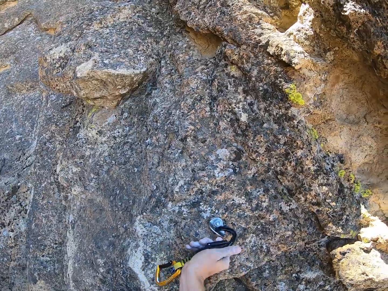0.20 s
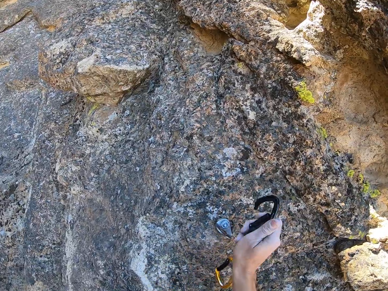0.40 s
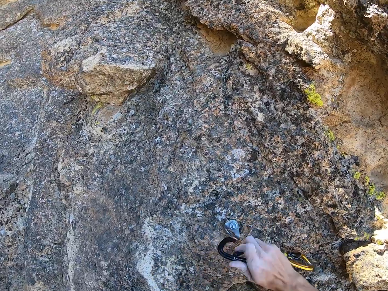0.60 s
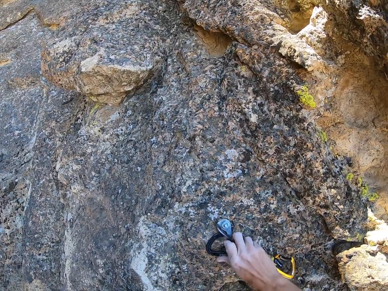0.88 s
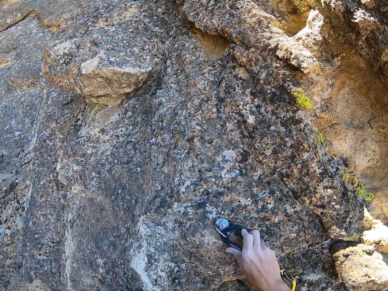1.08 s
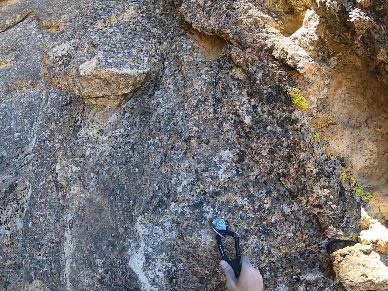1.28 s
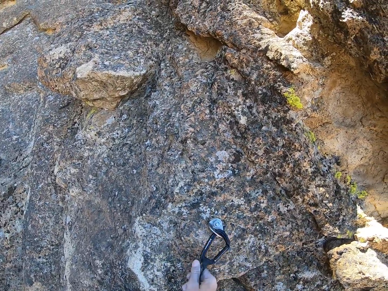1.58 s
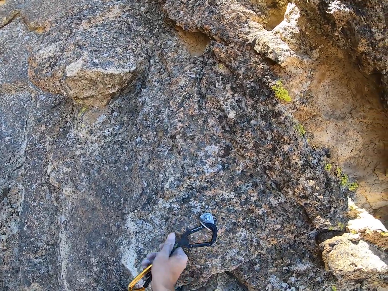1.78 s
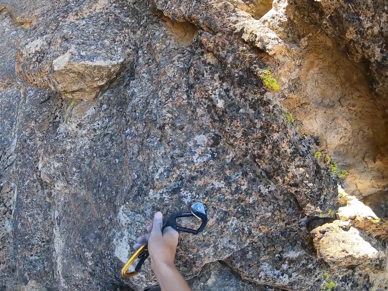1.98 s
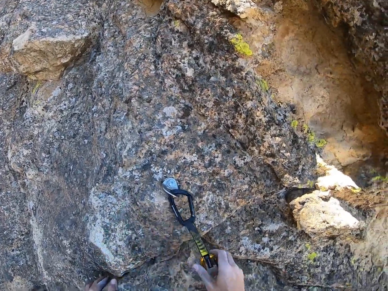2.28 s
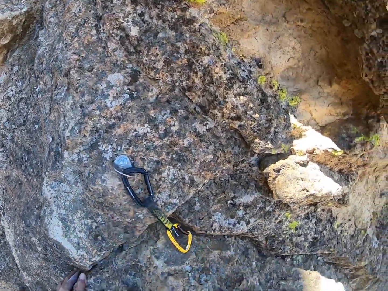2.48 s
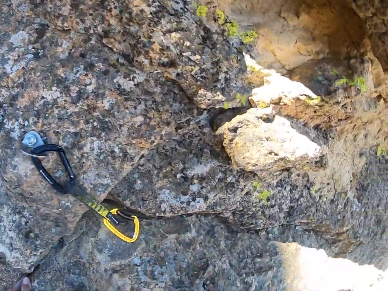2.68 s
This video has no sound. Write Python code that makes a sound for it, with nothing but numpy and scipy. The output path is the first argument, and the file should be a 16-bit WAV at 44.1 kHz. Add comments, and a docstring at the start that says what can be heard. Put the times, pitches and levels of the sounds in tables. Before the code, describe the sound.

Metal carabiners clack and rattle against a steel bolt and stone, close up, outdoors in light wind

```python
"""Clipping a quickdraw on a rock face

A climber clips a quickdraw into a bolt hanger, close to a small camera with two microphone ports.
Hand-damped carabiners clack on steel and stone (short damped modes with a crack of noise), a free one
rings faintly and hollow knocks sound (dying sines), and metal and webbing scrape (noise grains).
Sparse echoes return from rock and body; lumpy low noise is light wind, over a quiet outdoor floor."""
import sys
import numpy as np
from scipy import signal
from scipy.fft import rfft, irfft
from scipy.io import wavfile
from scipy.ndimage import uniform_filter1d

SR = 44100
rng = np.random.default_rng(int(sys.argv[2]) if len(sys.argv) > 2 else 0)


def volts_from_db(level):
    """Convert decibel levels to linear amplitude ratios."""
    exponent = np.asarray(level, float) / 20
    return 10 ** exponent


def master(y):
    """Save y as 16-bit WAV."""
    cut = np.clip(np.atleast_2d(y).T, -1, 1)
    pcm = np.round(cut * 32767)  # scale
    wavfile.write(sys.argv[1], SR, pcm.astype(np.int16))


N = 123480


def evened(x):
    """Scales a sound to an rms of one."""
    return x / np.sqrt(np.mean(x ** 2) + 1e-20)


def read(points, hz):
    """Reads a table of (frequency, value) along a logarithmic frequency axis."""
    f, value = np.transpose(points)
    return np.interp(np.log(hz + 1), np.log(f + 1), value)


def curve(rows, column):
    """Draws one table column as straight lines over the whole scene; times stand in column 0."""
    rows = np.array(rows)
    return np.interp(np.arange(N) / SR, rows[:, 0], rows[:, column])


def add(mix, s, sound):
    """Adds a sound into the mix at s seconds, cut at the end of the mix."""
    part = mix[max(round(s * SR), 0):][:len(sound)]
    part += sound[:len(part)]


def struck(modes, length):
    """A struck body: a sum of sines, each dying at its own t60."""
    t = np.arange(0, length, 1 / SR)
    return sum(volts_from_db(db - 60 * t / t60) * np.sin(2 * np.pi * hz * t) for hz, db, t60 in modes)


def clack(peak_db, centre_hz, high_db):
    """A quick contact rings hand-damped modes, the struck spot longest, with a crack of noise."""
    # modes of the held metal: (frequency [Hz], level [dB])
    held = [(1240, -2.5), (1520, -4), (2250, -4), (2700, -2), (3380, -3), (3900, -3.5), (4700, 0.5),
            (5350, 2.5), (6400, 5.5), (7500, 5.5), (8200, 5.5), (9200, 0.5), (10900, 1.5), (12600, -7.5)]
    hz, db = np.transpose(held)[:, :, None]
    t = np.arange(2000) / SR
    t60_s = 0.021  # at 5 kHz for the modes; higher ones die faster
    high_edge_hz = 5900  # where the highs reach high_db

    # tilt the modes away from the strongest region
    climb = np.minimum(np.log(hz / centre_hz) / np.log(high_edge_hz / centre_hz), 1)
    below = 8.0 * np.log2(hz / centre_hz)  # 8 dB per octave
    db = db + np.where(hz > centre_hz, high_db * climb ** 2, below)

    # every contact has slightly different mode levels, pitches and phases
    spread, detune, phase = rng.standard_normal((3, len(held), 1))
    mode_amp = volts_from_db(db + 2.0 * spread - 60 * t / t60_s * (hz / 5000) ** 0.3)
    ring = (mode_amp * np.sin(2 * np.pi * hz * (1 + 0.015 * detune) * t + phase)).sum(0)
    struck_spot = volts_from_db(2.5 - 60 * t / 0.04) * np.sin(2 * np.pi * centre_hz * t)
    ring = ring + struck_spot

    # the crack is noise with the spectrum of the modes
    colour = volts_from_db(read(np.c_[hz, db], np.fft.rfftfreq(len(t), 1 / SR)))
    crack = evened(irfft(rfft(rng.standard_normal(len(t))) * colour)) * volts_from_db(-60 * t / t60_s)
    sound = ring / abs(ring).max() + volts_from_db(-5.5) * crack
    rise = np.minimum(t / 0.0002, 1)
    band = signal.butter(3, [650, 12500], "band", fs=SR, output="sos")
    return volts_from_db(peak_db) * signal.sosfilt(band, sound * rise)


def clacks():
    """Held carabiners clacking on steel and stone, one damped contact after another."""
    # contacts: (time [s], level [dB], strongest region [Hz], highs [dB re that region])
    contacts = [(0.0024, -31.5, 4110, -23), (0.0748, -40, 4120, -22.5), (0.1316, -36, 3810, -19.5),
                (0.1533, -37, 3840, -12.5), (0.237, -18.5, 2250, -8.5), (0.244, -29.5, 1295, -37),
                (0.2962, -28, 3620, -12), (0.3384, -31.5, 1910, -17), (0.3486, -23.5, 2340, -8.5),
                (0.3617, -25, 2310, -13), (0.4341, -28.5, 3130, -14), (0.4394, -28.5, 2350, -9),
                (0.4516, -22.5, 2546, -11), (0.4818, -28.5, 2470, -9), (0.523, -36, 1240, -7.5),
                (0.5435, -23, 2785, -12), (0.595, -30, 2180, -18), (0.7052, -33, 1400, -15),
                (0.7501, -28.5, 1437, -17), (0.8145, -21, 3280, -11), (0.8769, -21, 2537, -28),
                (0.8825, -23, 4930, -51), (0.9149, -23, 4280, -14), (1.023, -24.5, 3650, -25),
                (1.0369, -30, 3300, -21.5), (1.051, -35, 3420, -10), (1.067, -17, 4620, -11),
                (1.0939, -14, 4080, -17), (1.1053, -22.5, 3340, -12), (1.1688, -46.5, 1640, -21.5),
                (1.2121, -18, 2750, -3), (1.338, -48, 3520, -17), (1.4616, -32.5, 4040, -22),
                (1.547, -29, 3270, -14), (1.634, -36, 3800, -10), (1.838, -45.5, 1390, -38),
                (1.9026, -48, 1290, -52), (1.95, -32, 4060, -19), (2.22, -50, 1240, -23),
                (2.238, -46.5, 3020, -17), (2.3206, -39, 2900, -29), (2.3313, -37.5, 3030, -24.5),
                (2.4573, -19.5, 3676, -15.5), (2.483, -42, 4500, 0), (2.5321, -10, 5295, -10),
                (2.5462, -21.5, 2920, -12), (2.569, -37.5, 2600, -35), (2.693, -33.5, 5440, -9),
                (2.7093, -34.5, 3350, -13), (2.732, -43, 5470, -5), (2.7513, -44.5, 3830, -23.5),
                (2.762, -37, 2500, -8)]
    out = np.zeros(N)
    for s, peak_db, centre_hz, high_db in contacts:
        add(out, s, clack(peak_db, centre_hz, high_db))
    return out


def free_rings():
    """A freely hanging carabiner rings its long modes until it is touched."""
    # modes of the free carabiner: (frequency [Hz], level [dB], t60 [s])
    free = [(3250, 0, .9), (3428, -13, .5), (3662, -10, .4), (7294, -18, .45), (9480, -18, .35)]
    # strikes: (time [s], level [dB], time until touched [s])
    strikes = [(.004, -66, 0.11), (0.241, -57, 0.19), (0.419, -50, 0.11), (0.542, -53.5, 0.04),
               (0.594, -60, 0.18), (0.704, -54, 0.064), (.755, -50, 0.044), (2.55, -60.5, 0.27)]
    out = np.zeros(N)
    for s, db, length in strikes:
        ring = struck(free, length + 0.012)
        touch = np.minimum(np.arange(len(ring))[::-1] / 440, 1)  # fades over the last 10 ms
        add(out, s, volts_from_db(db) * ring * touch)
    return out


def knocks():
    """Hollow knocks: two low modes, lowered in pitch for some of the blows."""
    # blows: (time [s], level [dB], pitch [share of the mode frequencies])
    blows = [(.238, -32.5, 1), (0.342, -36, 1), (2.459, -40, 0.44), (2.536, -41.5, 0.62)]
    # modes at a share of 1: (frequency [Hz], level [dB], t60 [s])
    hollow = [(410.6, -0.5, 0.087), (630, 2, 0.015)]
    out = np.zeros(N)
    for s, db, share in blows:
        add(out, s, volts_from_db(db) * struck(np.multiply(hollow, [share, 1, 1]), 0.2))
    return out


def scrape():
    """Dense grit of uneven size under each stroke of metal or webbing."""
    # strokes: (start [s], length [s], level before the swell [dB], centre frequency [Hz])
    strokes = [(0.283, 0.038, -45, 3670), (0.314, 0.024, -39.5, 3720), (0.409, 0.077, -44.5, 3430),
               (0.517, 0.018, -41.5, 2400), (0.983, 0.069, -49.5, 3440), (1.065, 0.018, -26.5, 4900),
               (1.079, 0.038, -34, 3660), (1.532, 0.14, -60.5, 3300), (1.877, 0.6, -65, 1600),
               (2.098, 0.094, -63.5, 2700), (2.67, 0.19, -54.5, 4340)]
    grains_per_s, grain_decay_s = 300, 0.0012
    sizes = volts_from_db(3.6 * np.minimum(rng.exponential(1, N), 3))  # at most 10.8 dB
    grains = sizes * (rng.random(N) < grains_per_s / SR)
    bursts = signal.lfilter([1], [1, -np.exp(-1 / (grain_decay_s * SR))], grains)
    spectrum = rfft(rng.standard_normal(N) * (1 + bursts))
    hz = np.fft.rfftfreq(N, 1 / SR)

    out = np.zeros(N)
    for s, length, db, centre_hz in strokes:
        octaves = np.log2((hz + 1) / centre_hz)
        # dB per octave; above the centre the fall steepens
        slope = np.where(octaves > 0, -5.5 * (1 + octaves), 8.0)
        grit = evened(irfft(spectrum * volts_from_db(slope * octaves), N))
        grit = grit[round(s * SR):][:round(length * SR)]
        swell = abs(np.sin(np.pi * np.arange(len(grit)) / (length * SR))) ** 0.8
        add(out, s, volts_from_db(db) * grit * swell)
    return out


def ports(x):
    """The two ports hear a near source with a level and phase offset that depends on frequency."""
    # port balance: (frequency [Hz], left minus right [dB])
    balance = [(250, 1.5), (1200, -10.5), (3000, -4), (5000, 0.5), (12000, -4)]
    hz = np.fft.rfftfreq(N, 1 / SR)
    # left leads by up to 0.6 rad, then lags by 0.14 ms more above 3300 Hz, at most to -1.6 rad
    lead = 0.6 * np.minimum(hz / 1500, 1) - 2 * np.pi * 0.00014 * np.maximum(hz - 3300, 0)
    lead = np.maximum(lead, -1.6)
    half = volts_from_db(read(balance, hz) / 2) * np.exp(0.5j * lead)  # half the offset for each port
    return irfft(rfft(x) * np.array([half, 1 / half]), N)


def rock(x):
    """Short scattered reflections from the rock face and the body, the treble dying sooner."""
    # echo decay: (frequency [Hz], t60 [s])
    decay = [(1500, 0.32), (10000, 0.21)]
    taps = np.zeros((2, 12000))
    at = np.arange(60, 11980, 20) + rng.integers(0, 20, (2, 596))  # one echo per 20 samples
    np.put_along_axis(taps, at, rng.choice([-1., 1.], at.shape), 1)
    hz, t, z = signal.stft(taps, SR, nperseg=128)
    fading = volts_from_db(-60 * t / read(decay, hz)[:, None])
    tail = signal.istft(z * fading, SR, nperseg=128)[1]
    tail = tail / np.linalg.norm(tail[0])
    return signal.fftconvolve(x[None], tail, axes=1)[:, :N]


def pair(points, same):
    """Two noises of one spectrum; same is their likeness, from -1 opposed to 1 identical."""
    a, b = rfft(rng.standard_normal((2, N)))
    same = np.clip(same, -1, 1)
    both_ports = np.array([a, same * a + np.sqrt(1 - same ** 2) * b])
    colour = volts_from_db(read(points, np.fft.rfftfreq(N, 1 / SR)))
    return evened(irfft(both_ports * colour, N))


def wind():
    """Wind buffets the ports: lumpy low pressure noise, nearly unrelated at the two."""
    # wind strength: (time [s], level [dB])
    strength = [(0, -49), (.38, -36), (.56, -48.5), (.63, -32), (.78, -34), (1.0, -46.5), (1.3, -53),
                (1.52, -54), (1.6, -38.5), (1.76, -40), (2.08, -38), (2.16, -48), (2.29, -37.5),
                (2.37, -70.5)]
    # gust spectrum: (frequency [Hz], relative density [dB per Hz])
    gust = [(15, -2), (45, 2), (90, -3.5), (160, -19.5), (400, -67)]
    lumps = uniform_filter1d(rng.standard_normal((2, N)), 1800)  # smoothed twice over 41 ms
    lumps = evened(uniform_filter1d(lumps, 1800))
    buffeting = evened(pair(gust, -0.2) * volts_from_db(3.0 * lumps))
    return volts_from_db(curve(strength, 1)) * buffeting


def outdoor_air():
    """The quiet outdoor floor: steady noise, more alike at the two ports in the bass."""
    # floor spectrum: (frequency [Hz], relative density [dB per Hz])
    floor = [(60, -9), (170, -9), (330, -22), (850, -25), (1100, -30), (4000, -39.5), (16000, -68)]
    # likeness of left and right: (frequency [Hz], likeness [-1 to 1])
    likeness = [(250, 0.71), (1500, 0.16)]
    return volts_from_db(-54) * pair(floor, read(likeness, np.fft.rfftfreq(N, 1 / SR)))


def scene():
    """The gear close to the ports, its echoes 20 dB down, the wind and the outdoor floor."""
    near = clacks() + free_rings() + knocks() + scrape()
    return ports(near) + volts_from_db(-20) * rock(near) + wind() + outdoor_air()


def top_cut(x):
    """Nothing passes above the cut-off."""
    return signal.sosfilt(signal.butter(12, 16470, fs=SR, output="sos"), x)


def record(dry):
    """The camera keeps the two-port mix at its own level."""
    return top_cut(dry)


dry = scene()
out = record(dry)
master(out)
```